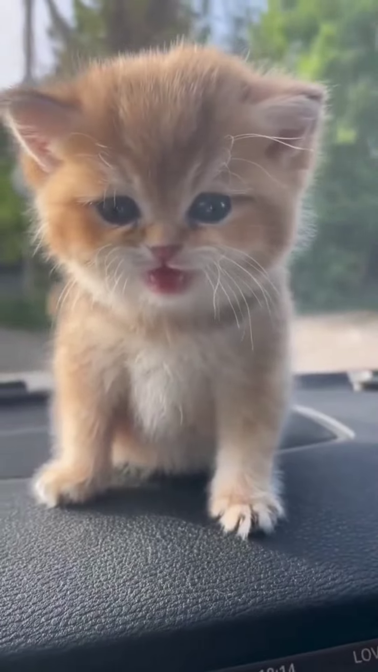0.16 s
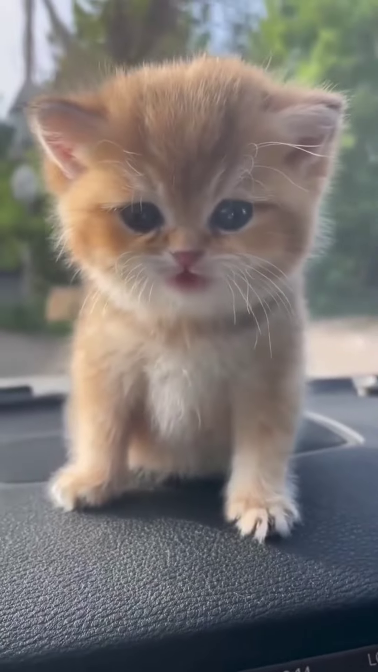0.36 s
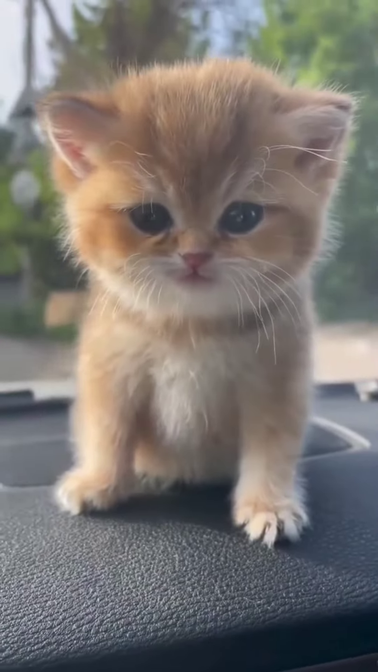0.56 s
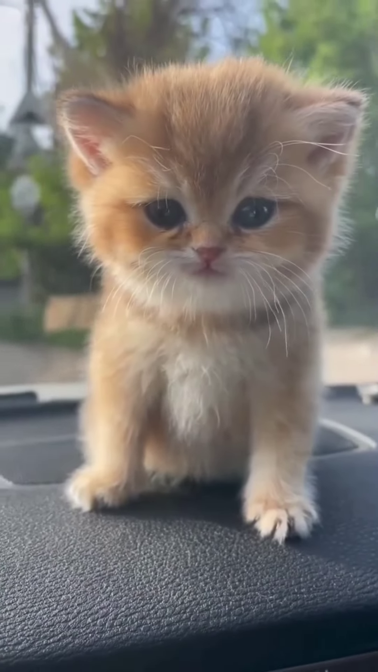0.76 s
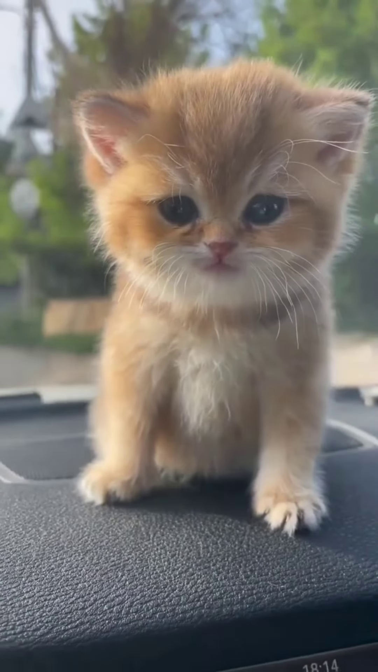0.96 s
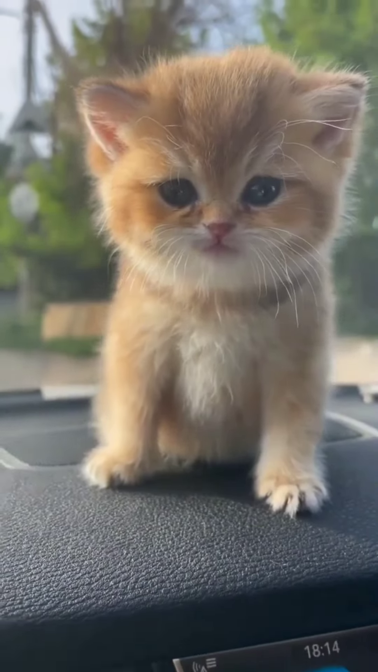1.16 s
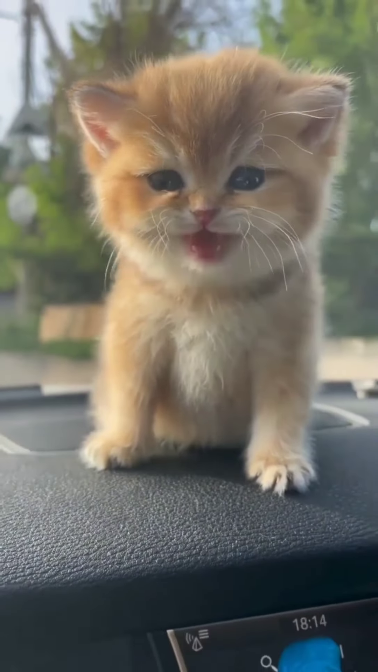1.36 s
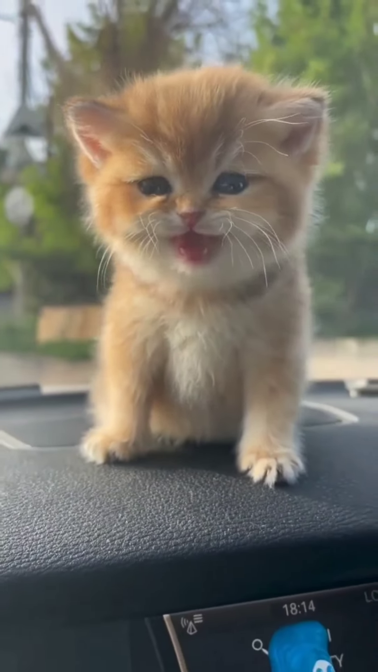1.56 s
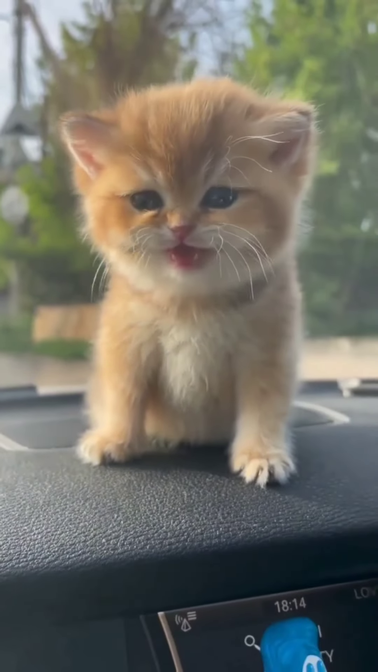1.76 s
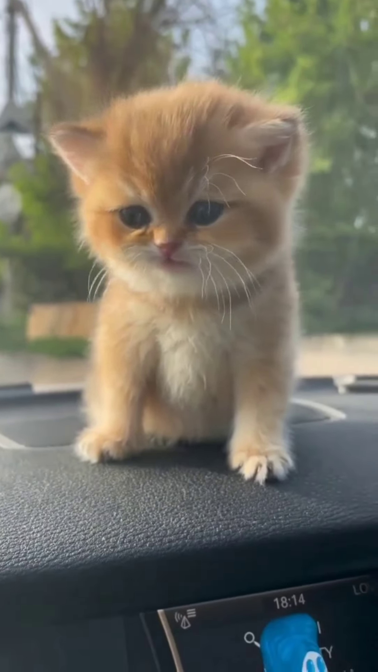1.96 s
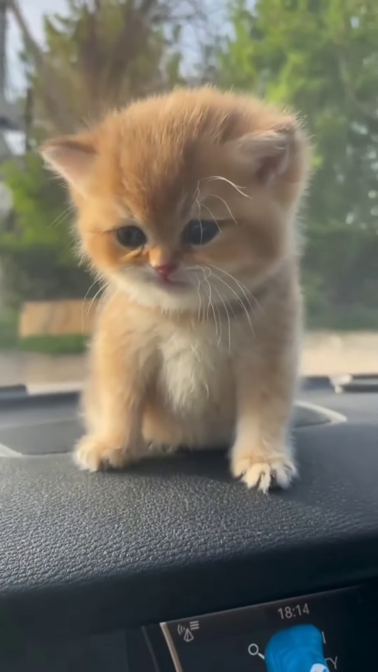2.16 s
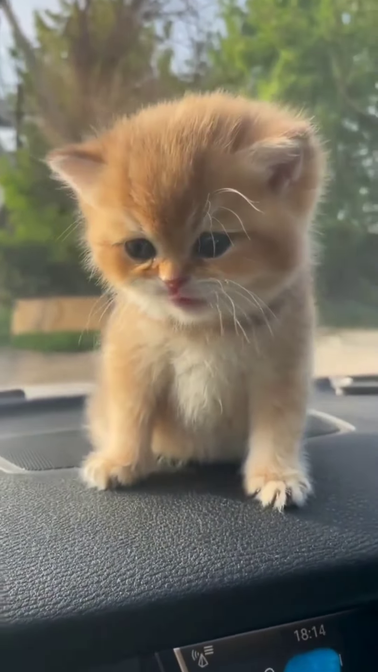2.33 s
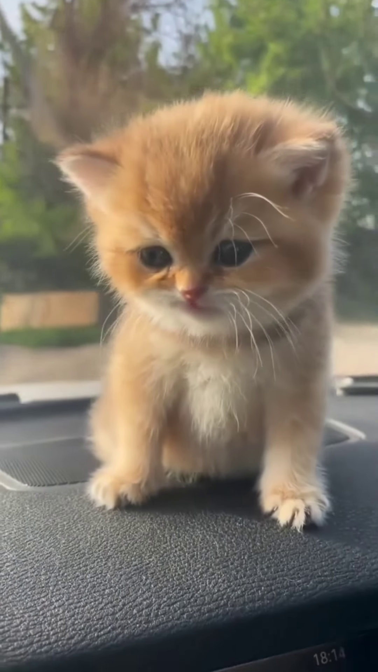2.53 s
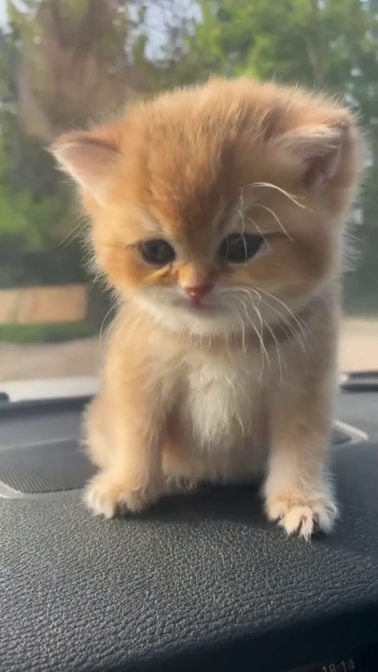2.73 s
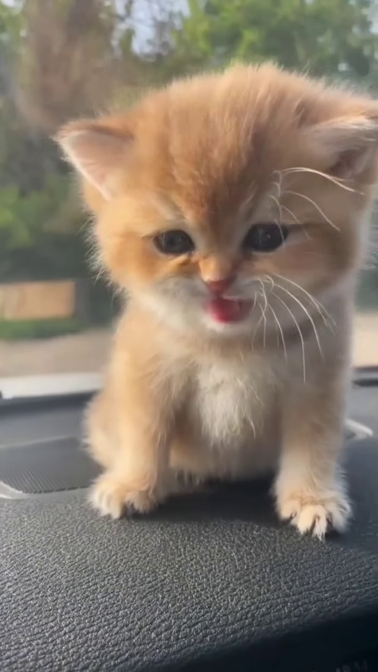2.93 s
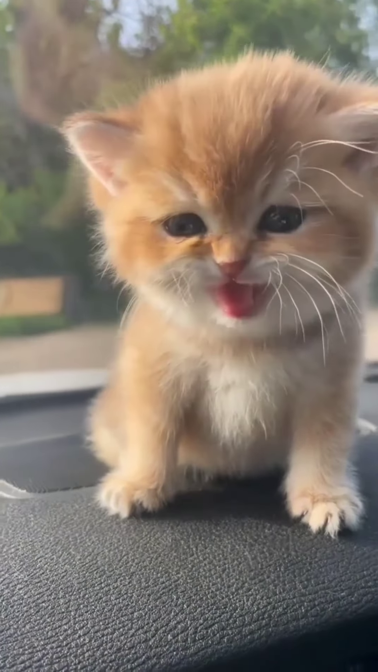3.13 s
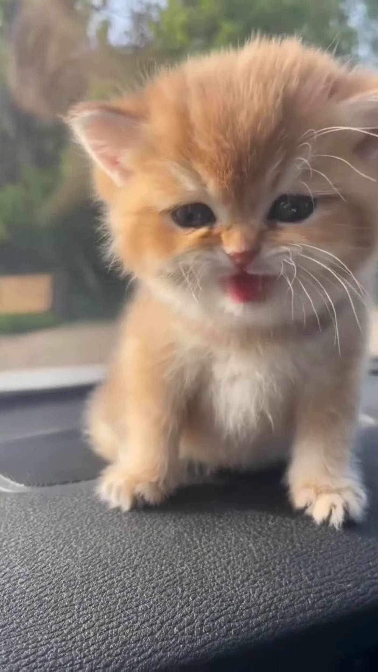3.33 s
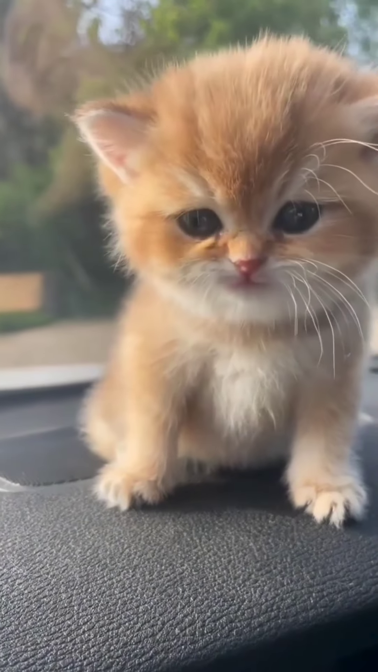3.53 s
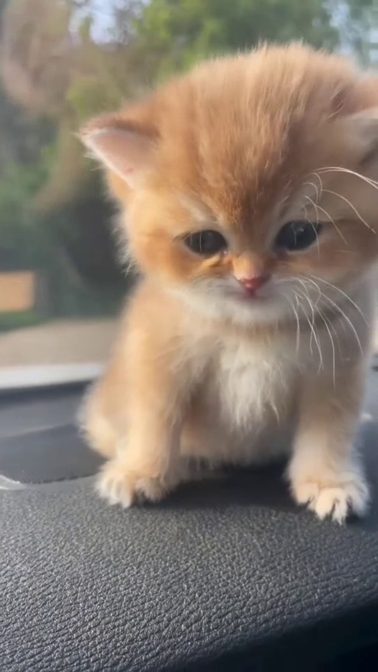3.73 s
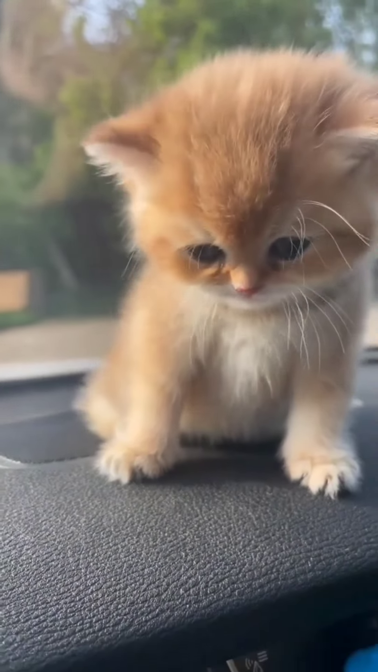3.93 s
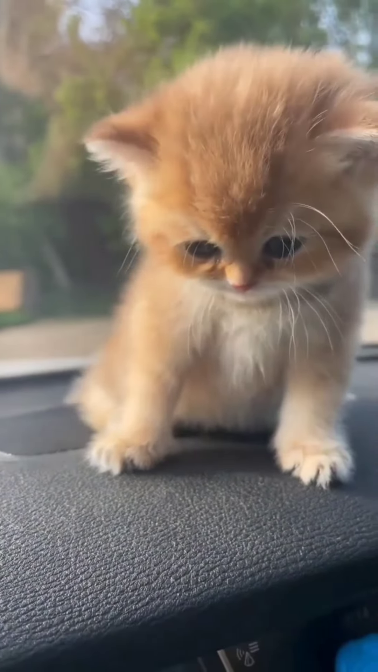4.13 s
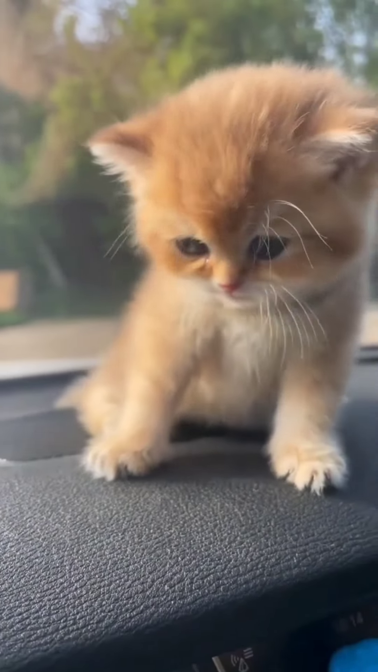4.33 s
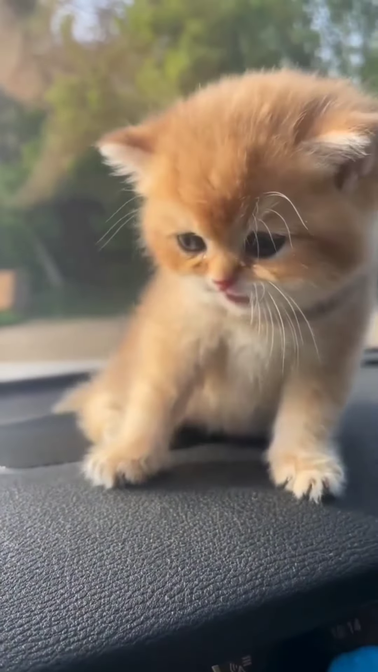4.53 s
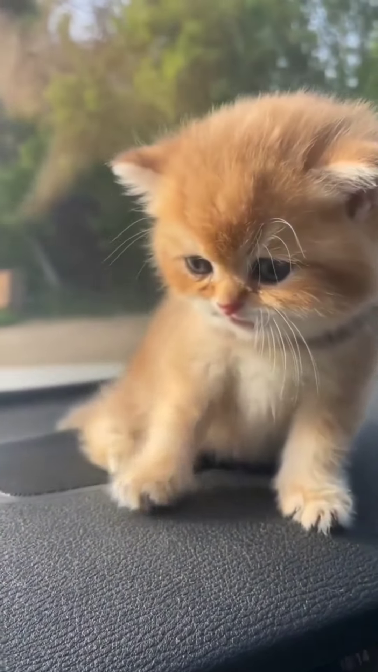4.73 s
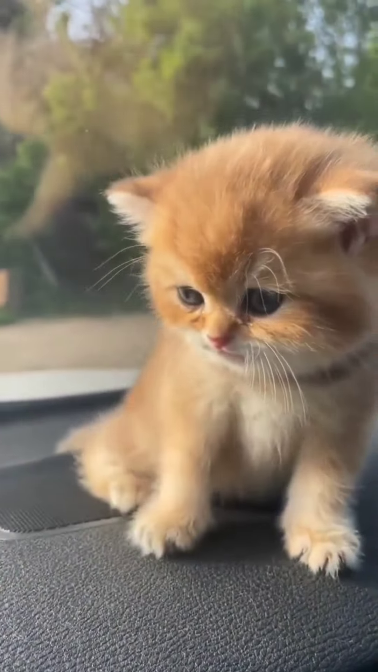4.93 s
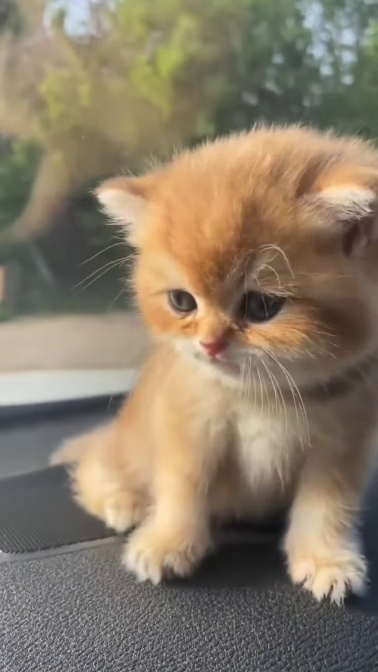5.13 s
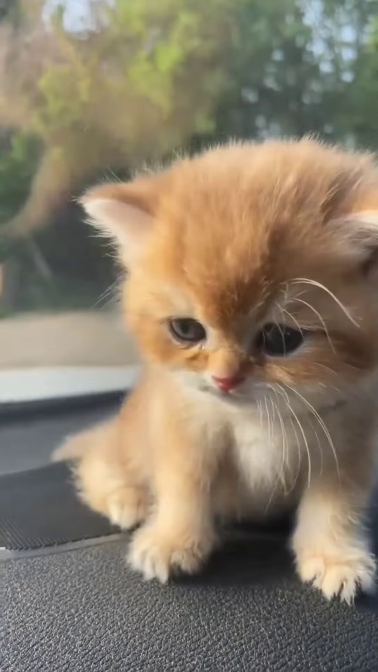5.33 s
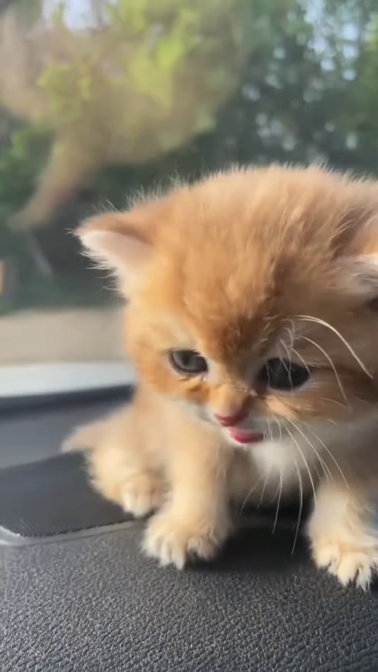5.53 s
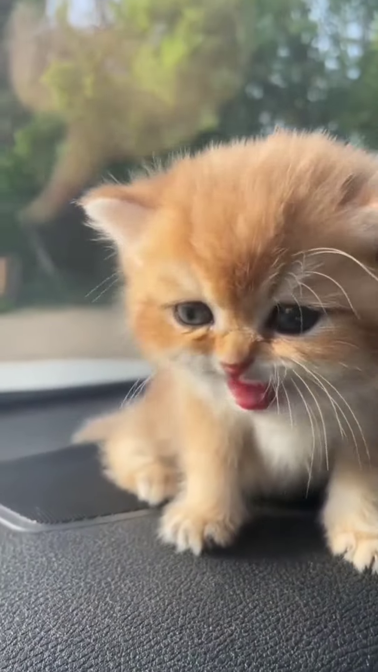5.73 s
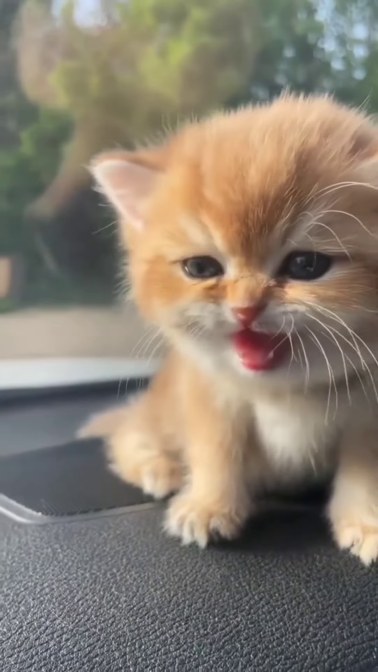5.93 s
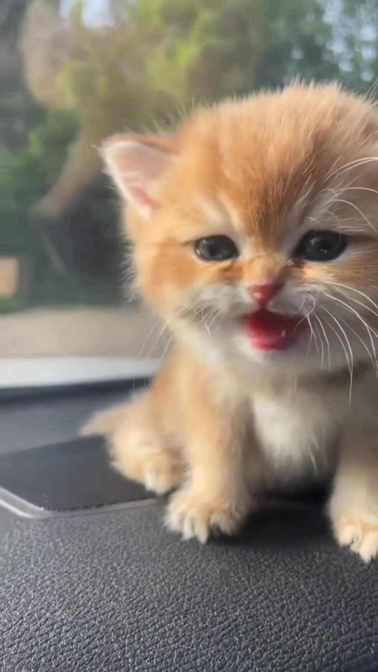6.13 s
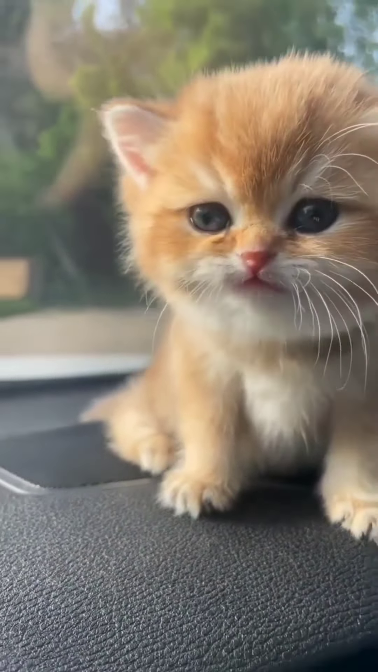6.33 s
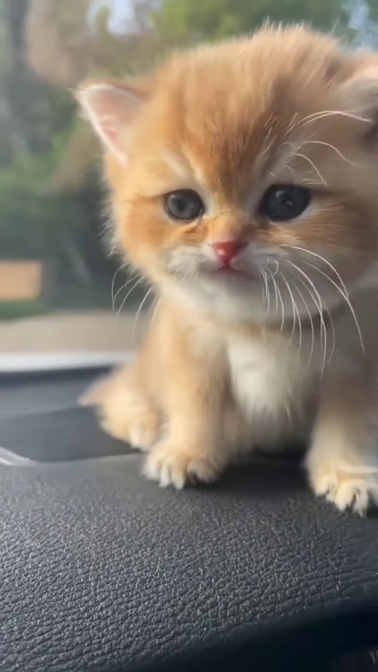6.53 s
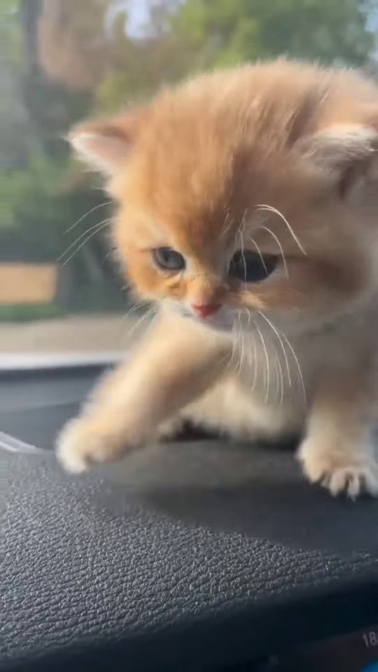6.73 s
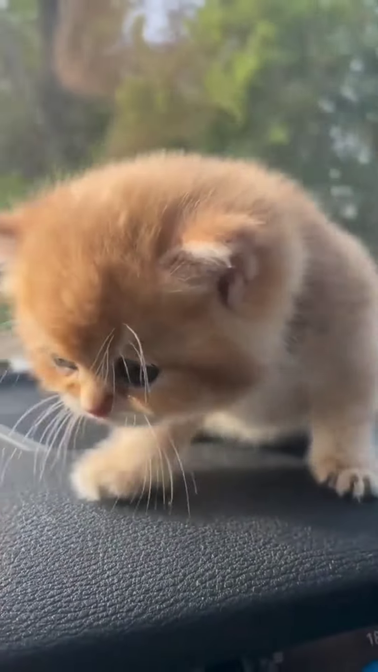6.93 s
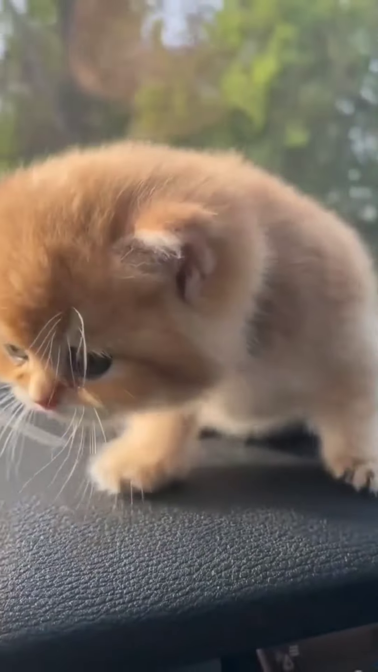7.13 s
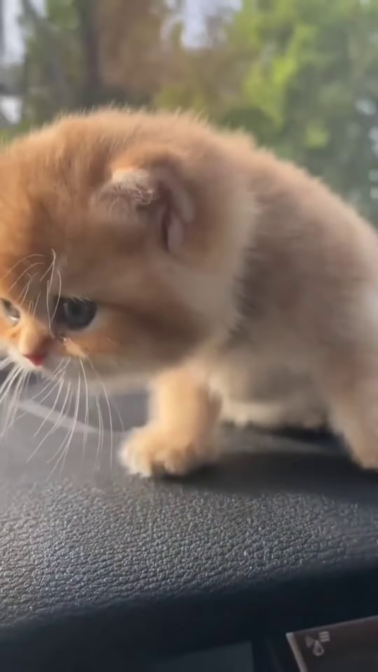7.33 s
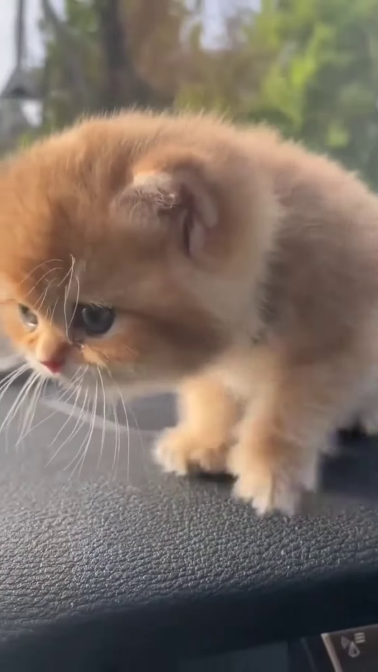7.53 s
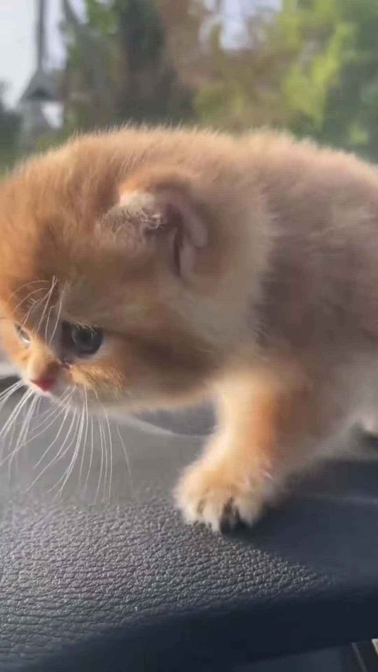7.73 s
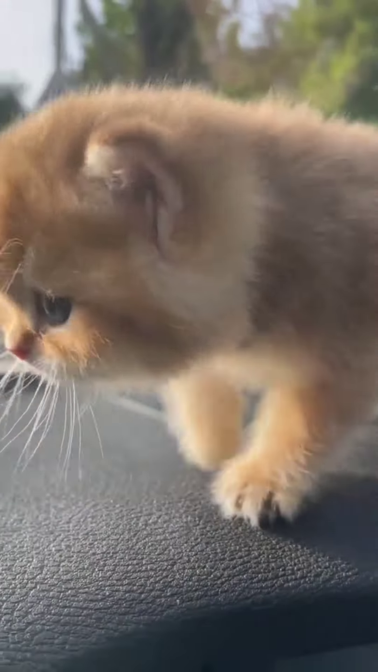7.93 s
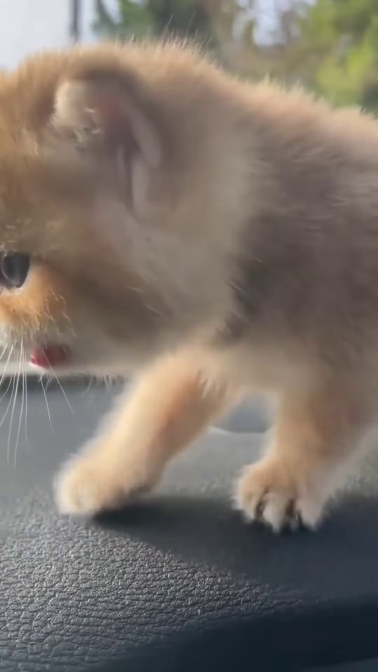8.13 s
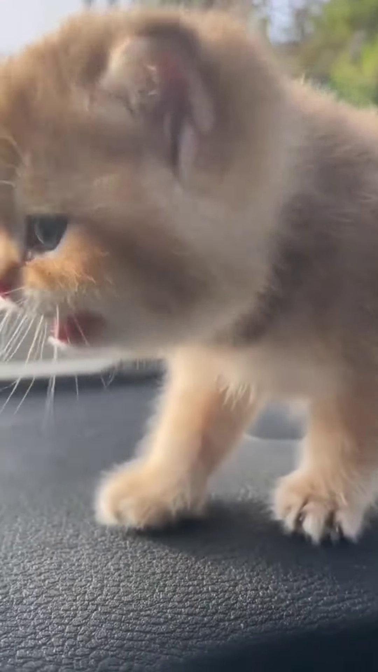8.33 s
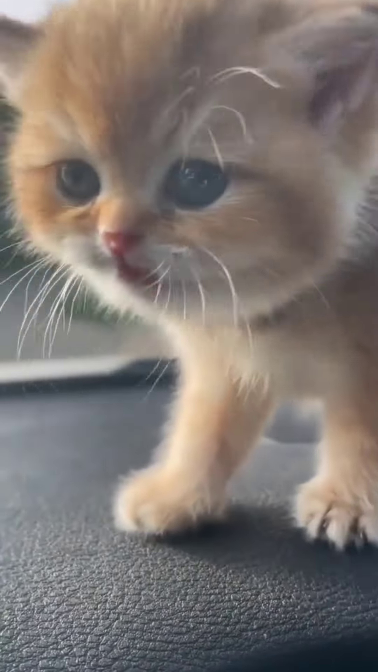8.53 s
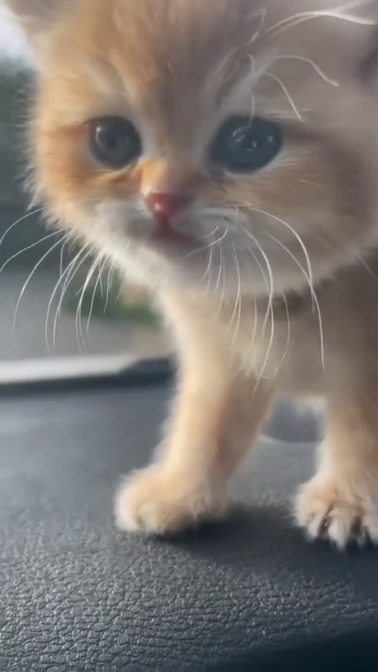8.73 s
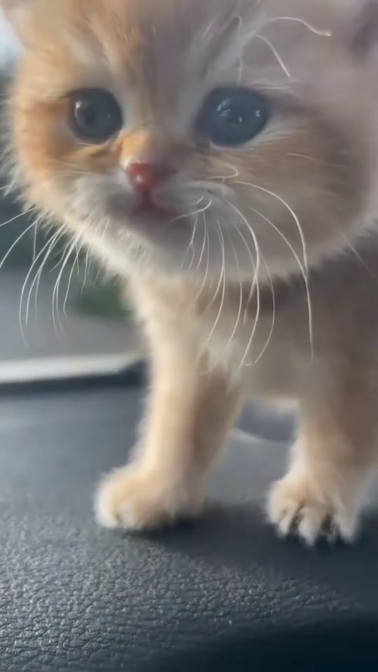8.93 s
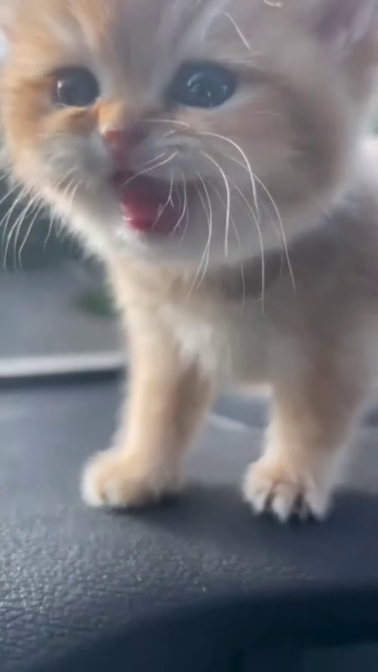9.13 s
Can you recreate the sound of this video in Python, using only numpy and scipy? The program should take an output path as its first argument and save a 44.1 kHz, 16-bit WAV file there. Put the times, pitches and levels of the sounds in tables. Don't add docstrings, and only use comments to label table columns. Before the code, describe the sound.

Close handheld pickup of a very young kitten in a slowly moving car. Short, high, thin mews come about every one or two seconds, some clear, some hoarse, ending in soft lip smacks. Tiny claws tick on hard plastic. Under it the engine hums low, sinks, then revs up boomily after the longest cry and falls back. A sharp claw click and a clipped cry finish it.

```python
import sys
import numpy as np
from scipy import signal
from scipy.fft import rfft, irfft
from scipy.io import wavfile
from scipy.ndimage import uniform_filter1d

SR = 44100
rng = np.random.default_rng(int(sys.argv[2]) if len(sys.argv) > 2 else 0)


def invert_db(level):
    return 10 ** (np.asarray(level, dtype=float) / 20)


def materialize(psi):
    bounded = np.clip(np.atleast_2d(psi).T, -1, 1)
    quanta = np.round(bounded * 32767).astype(np.int16)
    wavfile.write(sys.argv[1], SR, quanta)


N = 404397
T = np.arange(N) / SR


def level(x, db=0):
    return x * invert_db(db) / np.sqrt(np.mean(x ** 2))


def band(x, lo_hz, hi_hz):
    sos = signal.butter(3, [lo_hz, min(hi_hz, .45 * SR)], "band", fs=SR, output="sos")
    return signal.sosfilt(sos, x)


def noise_band(lo_hz, hi_hz, db=0):
    return level(band(rng.standard_normal(N), lo_hz, hi_hz), db)


def walk(rate, size=N):
    k = max(int(SR / rate), 1)
    noise = rng.standard_normal(size + 2 * k)
    return level(uniform_filter1d(uniform_filter1d(noise, k), k))[k:k + size]


def coloured(points):
    hz, db = np.transpose(points)
    f = np.maximum(np.arange(N // 2 + 1) * SR / N, 1)
    weight = invert_db(np.interp(np.log(f), np.log(hz), db, -90, -90))
    return irfft(rfft(rng.standard_normal(N)) * weight, N)


def played(table, edge_s):
    s, *columns = np.transpose(table)
    span = slice(max(int(s[0] * SR), 0), min(int(s[-1] * SR), N))
    t = T[span]
    still_sounding = s[-1] > T[-1] - .01
    fade = np.clip(np.minimum(t - s[0], s[-1] - t + still_sounding) / edge_s, 0, 1)
    return span, [np.interp(t, s, c) for c in columns], fade


def engine_line(hz, db, flutter_db, rate):
    phase = 2 * np.pi * np.cumsum(hz * (1 + .02 * walk(rate))) / SR
    return np.sqrt(2) * invert_db(db + flutter_db * walk(rate)) * np.sin(phase)


# (time [s], firing rate [Hz], boom [dB], road [dB])
DRIVE = [(0.0, 38.66, -55, -71), (0.28, 38.27, -58, -75), (2.12, 36.32, -57, -74),
         (2.48, 36.17, -52.5, -71), (3.04, 35, -60.5, -71.5), (4.72, 30, -57.5, -66.5),
         (5.62, 27.99, -61.5, -67.5), (5.9, 29.23, -73, -65.5), (6.28, 30.86, -49.5, -63.5),
         (6.49, 35.73, -45.5, -63), (6.79, 41.6, -39, -56.5), (7.1, 41.33, -38.5, -57.5),
         (7.33, 40.35, -36.5, -60.5), (7.94, 35.4, -45, -61.5), (8.04, 34.4, -60.5, -64.5),
         (8.17, 33.6, -45.5, -61.5), (8.4, 31.4, -61.5, -64), (9.17, 28.4, -50.5, -67.5)]
# (frequency [Hz], spectrum level [dB per Hz])
ROAD_SPECTRUM = [(12, -40), (20, -4), (32, -6.5), (48, -6.5), (56, -7.5), (65, -18.5), (96, -9.5),
                 (146, -25), (188, -18.5), (238, -26), (608, -44.5), (812, -53.5), (1500, -61),
                 (1950, -93.5), (3300, -120)]
# (frequency [Hz], spectrum level [dB per Hz])
HISS_SPECTRUM = [(410, -28), (700, -2), (821, -10.5), (999, -2), (1100, -8.5), (1550, -8.5), (13200, -18.5)]


def car():
    s, *controls = np.transpose(DRIVE)
    firing_hz, boom_db, road_db = (np.interp(T, s, c) for c in controls)
    boom = engine_line(firing_hz, boom_db, flutter_db=0.74, rate=9)
    drone_db = -57.5 + 0.37 * (boom_db + 56.5) + 0.65 * (road_db + 66.5)
    drone = invert_db(-3) * engine_line(firing_hz + 47.3, drone_db, flutter_db=0.5, rate=14)
    rumble = coloured(ROAD_SPECTRUM)
    rumble = rumble / np.std(band(rumble, 127.2, 330))
    rumble = signal.sosfilt(signal.butter(2, 60, "high", fs=SR, output="sos"), rumble)
    road = rumble * invert_db(road_db + 3 + 2.01 * walk(18))
    hiss = level(coloured(HISS_SPECTRUM), -85) * invert_db(walk(12))
    return boom + drone + road + hiss


# (frequency [Hz], gain [dB])
TRACT = [(500, -6), (1700, -4), (2300, -11), (3100, 2), (3900, -4), (5500, -5.5), (7000, -2.5), (8300, -6),
         (9200, -2.5), (10500, -13), (12000, -12), (13500, -25)]


def tract_db(f, throat_db, mouth_db, mouth_hz):
    opened = 1 / (1 + np.exp((3780 - f) / 120))
    peak_db = 9 * np.exp(-((f - mouth_hz) / 900) ** 2)
    base_db = (1 - opened) * (throat_db - 1) + opened * (mouth_db - 8 + peak_db)
    hz, db = np.transpose(TRACT)
    return base_db + np.interp(np.log(f), np.log(hz), db)


# (time [s], depth [0-1])
DOUBLING = [
    (1.28, 0),
    (1.33, 0.26),
    (1.4, 1),
    (1.5, 0.66),
    (1.56, 0),
]


def mew(table, voice, hiss):
    span, (hz, first_db, open_db, rough), fade = played(table, 0.0032)
    rough, n = np.clip(rough, 0, 1), len(hz)
    second_start, second_end, throat, mouth_start, mouth_end = voice
    second_db = first_db + np.linspace(second_start, second_end, n)
    mouth_hz = np.linspace(mouth_start, mouth_end, n)
    throat_db, mouth_db = first_db + throat + 0.26 * open_db, first_db + open_db

    waver = .002 * walk(41, n) + (0.0009 + .05 * rough) * walk(360, n)
    phase = 2 * np.pi * np.cumsum(hz * (1 + waver)) / SR
    partials = invert_db(first_db) * np.sin(phase)
    partials += invert_db(second_db + 1.6 * walk(30, n)) * np.sin(2 * phase)
    for k in range(3, 19):
        strength = invert_db(tract_db(k * hz, throat_db, mouth_db, mouth_hz) + 1.7 * walk(35, n))
        partials += strength * (k * hz < 14500) * np.sin(k * phase + 0.19 * k)

    half = np.clip(np.interp(T[span], *np.transpose(DOUBLING), 0, 0) + 0.18 * rough, 0, 1)
    alternation = 1 + half * invert_db(3.5 * walk(40, n)) * np.cos(phase / 2)
    shimmer = 1 + .6 * rough * walk(230, n)
    voiced = np.sqrt(2) * partials * alternation * shimmer * np.sqrt(1 - rough)

    air = invert_db(first_db - 14.5) * hiss[0][1][span]
    for f, noise in hiss[1:]:
        air += invert_db(tract_db(f + 0 * hz, throat_db, mouth_db, mouth_hz) - 2.5) * noise[span]
    leak = rough * air * (1 + 0.33 * np.cos(phase))
    return span, fade * (voiced + leak)


# (time [s], pitch [Hz], effort [dB], mouth opening [dB], roughness [0-1])
SQUEAK = [(.045, 1460, -55, -11, 0.54), (.055, 1374, -50.5, -19, 0.33), (.097, 1391, -47, -21, 0.23),
          (.15, 1435, -55, -13, 0), (0.181, 1458, -53.5, -18, 0.39), (.2, 1467, -56, -10, 0.02),
          (0.226, 1460, -59, -10, 0.35), (.25, 1450, -57, -15, 0), (.285, 1370, -81, -33, 0)]
AFTER_SQUEAK = [(.27, 802, -74, -30, .5), (.33, 893, -63.5, -33, 1), (.4, 820, -76, -30, .5)]
MURMUR = [(.55, 630, -82, -30, .35), (.585, 620, -74, -30, .3), (.63, 600, -84, -30, .35)]
WARBLE = [(1.28, 1137, -52.5, -18, 0.88), (1.301, 1074, -48.5, -16.5, 0.46),
          (1.389, 1153, -55.5, -10.5, 0.15), (1.473, 1210, -62.5, -5, 0.14),
          (1.555, 1095, -51, -20.5, 0.49), (1.64, 1055, -53, -16.5, 0.27), (1.747, 1308, -63, -17, 0.037),
          (1.83, 1268, -62.5, -27, 0.026), (1.88, 1150, -91, -30, 0.039)]
CRY = [(2.933, 1029, -49, -6.5, 0.56), (2.955, 1062, -48, 5, 0.25), (3.081, 1031, -49, 4.5, 0.1),
       (3.12, 1015, -53, 9, 0.088), (3.227, 976, -56.5, 10.5, .05), (3.292, 964, -55, -2, 0.041),
       (3.367, 997, -55, -15, .04), (3.375, 1024, -55, -17, 0.28)]
CRY_END = [(3.373, 1100, -60.5, -17, 0.3), (3.414, 1143, -61.5, -14, 0), (3.445, 1145, -64, -16, 0.031),
           (3.458, 1120, -102, -3, 0.018)]
CROAK = [(4.54, 798, -46.5, -25.5, 0.94), (4.584, 812, -47, -30, 0.66), (4.612, 784, -48, -26, .12),
         (4.68, 765, -50.5, -28, .05), (4.693, 776, -47, -33, 1), (4.74, 833, -49.5, -48, 0.92),
         (4.776, 758, -51.5, -30, 0.79)]
CROAK_TOP = [(4.68, 1120, -56, -22, .5), (4.7, 1093, -51, -34, 0.43), (4.751, 996, -51.5, -33, 0.61),
             (4.78, 1000, -51.5, -32, 0.25), (4.8, 1034, -72, -13, 0.12)]
GULP = [(5.438, 1050, -43.5, -28, .2), (5.45, 990, -61.5, -41, 0.062), (5.464, 946, -80, -30, .05)]
YELL = [(5.54, 721, -60, -7, 0.52), (5.555, 771, -47.5, -20, .4), (5.577, 914, -52.5, 9.5, 0.58),
        (5.604, 954, -54.5, 11.5, 0.3), (5.661, 962, -56, 14.5, 0.17), (5.772, 933, -58.5, 20.5, 0.12),
        (5.959, 903.6, -64.5, 24, 0.022), (6.164, 921, -64, 13, 0.1), (6.197, 916, -66, 2.5, .1)]
YELL_END = [(6.197, 1067, -55, -2, 0.091), (6.206, 1110, -51.5, -24, 0.088), (6.227, 1081, -51, -22, 0.12),
            (6.25, 1040, -105, 0.5, .15)]
LAST_CRY = [(9.143, 833, -64, 22, .5), (9.149, 828, -56.5, 14.2, .4), (9.17, 843, -57.5, 19, .4)]
# (2nd partial at start [dB], 2nd partial at end [dB], throat [dB],
# mouth resonance at start [Hz], mouth resonance at end [Hz])
VOICES = [(-13, 0, -4.5, 8900, 8000), (-16, -4, -6.5, 8900, 6300), (-18.5, -5, -13.5, 7100, 6600),
          (-3, -3, 0.5, 5100, 4000), (-15.5, -5, -8, 6000, 1800), (-23, -28, -5, 3400, 5500),
          (-2, 7.5, -3.5, 6330, 4100), (-12, -10.5, -5, 4700, 5800), (6, 16.5, -11, 7500, 5900),
          (-30, -27, -28, 5500, 5500), (-39, -23, -5, 6000, 8500), (-24, -11, -26, 5100, 4900)]
# (lower edge [Hz], upper edge [Hz])
POCKET_HZ = (8550, 9800)


def mews():
    out = np.zeros(N)
    hiss = [(f, noise_band(f - 500, f + 500)) for f in np.arange(1100., 13500, 1000)]
    calls = (SQUEAK, WARBLE, CRY, CRY_END, CROAK, GULP, YELL, YELL_END, LAST_CRY, MURMUR,
             CROAK_TOP, AFTER_SQUEAK)
    for table, voice in zip(calls, VOICES):
        span, sound = mew(table, voice, hiss)
        out[span] += sound
    pocket = signal.butter(3, POCKET_HZ, "bandstop", fs=SR, output="sos")
    passed = signal.sosfilt(pocket, out)
    return passed + invert_db(-24) * (out - passed)


def taps(events, plop_db, focus_db, decay_ms):
    out, t = np.zeros(N), np.arange(2600) / SR
    shape = (1 - np.exp(-t / 0.0008)) * (np.exp(-t * 1000 / decay_ms) + 0.17 * np.exp(-t / 0.0235))
    plop_hz = 300 + 1500 * np.exp(-t / 0.00289)
    plop = np.sin(2 * np.pi * np.cumsum(plop_hz) / SR) * np.exp(-t / 0.015)
    for s, peak_db, bright in events:
        low_db, mid_db, top_db = -focus_db * (np.arange(-1, 2) - bright) ** 2
        noise, drift = rng.standard_normal((2, len(t)))
        crackle = noise * invert_db(4.8 * uniform_filter1d(drift, size=40) * np.sqrt(40))
        burst = level(band(crackle, 331, 820), low_db)
        burst += level(band(crackle, 1480, 3850), mid_db)
        burst += level(band(crackle, 5360, 17000), top_db)
        hit = invert_db(peak_db) * (burst * shape + invert_db(low_db + plop_db) * plop)
        i = int(s * SR)
        out[i:i + len(t)] += hit[:N - i]
    return out


# (time [s], peak level [dB], brightness [-1 dull to 1 bright])
SMACKS = [
    (.387, -62.5, -0.47),
    (1.911, -60.5, -0.37),
    (3.518, -54.5, -0.84),
    (4.81, -54, -0.77),
    (5.439, -62, -0.247),
    (6.229, -58.5, -.6),
    (8.461, -55.5, 0.34),
]


def lip_smacks():
    return taps(SMACKS, plop_db=4, focus_db=4.5, decay_ms=5)


# (peak time [s], rise [s], fall [s], level [dB], brightness [dB])
PANTS = [(1.281, 0.054, 0.0091, -84, -11), (2.3, .04, .11, -83, 7.5), (2.846, .05, 0.028, -76, 10.5),
         (3.688, 0.077, .11, -87.5, 3), (4.35, 0.06, .07, -81, 9), (5.458, .015, .045, -78, 1.5),
         (6.895, 0.018, 0.046, -74, -3.5), (6.971, 0.04, 0.053, -70, -5), (6.83, .12, 0.083, -87, -9.5),
         (7.33, 0.24, .25, -92, -8.5), (8.088, .012, 0.074, -76.5, 4), (8.22, .12, 0.23, -82, -7),
         (9.105, 0.046, 0.048, -68.5, 1), (9.14, 0.025, 0.016, -66, -3.5)]


def pants():
    out = np.zeros(N)
    low = noise_band(650, 2730)
    middle = level(noise_band(4500, 6500) + noise_band(3700, 7150))
    top = noise_band(9800, 13200)
    grain = invert_db(3 * walk(110))
    for s, rise_s, fall_s, db, bright_db in PANTS:
        swell = [(s - rise_s, -14), (s, 0), (s + fall_s, -14)]  # (time [s], level [dB])
        span, (swell_db,), fade = played(swell, 0.029)
        breath = invert_db(-bright_db) * low[span] + invert_db(bright_db) * top[span]
        breath += invert_db(4.5 - 0.57 * abs(bright_db)) * middle[span]
        out[span] += fade * grain[span] * invert_db(db + swell_db) * breath
    return out


# (time [s], peak level [dB], brightness [-1 dull to 1 bright])
CLAWS = [(2.2673, -57.5, -0.74), (2.605, -65, 1), (2.7044, -61.5, -0.21), (2.8444, -53, 1),
         (4.0272, -64.5, 1), (4.316, -61.5, 1), (5.454, -72, 0.29), (6.8922, -56, -.2),
         (6.9721, -51, -0.94), (7.217, -72, 0.91), (7.472, -66.5, -0.3), (7.9167, -56.5, -0.28),
         (8.0815, -63.5, 0.66), (8.373, -60, -1.3), (8.9635, -67, -1.14), (9.1456, -41.5, 0.035)]


def claw_ticks():
    return taps(CLAWS, plop_db=-43, focus_db=8, decay_ms=3.46)


# (centre [Hz], width [Hz], level [dB])
SILENT_BANDS = [
    (635, 140, 5),
    (1480, 444, 1.5),
    (2465, 700, -18),
    (6220, 594, 2.5),
    (7450, 790, -1.5),
]
# (time [s], level [dB])
SILENT_MEW = [
    (8.09, -75),
    (8.12, -78),
    (8.26, -75.5),
    (8.33, -81),
    (8.38, -93),
]


def silent_mew():
    out = np.zeros(N)
    span, (db,), fade = played(SILENT_MEW, 0.0086)
    air = np.zeros(N)
    for hz, width_hz, gain_db in SILENT_BANDS:
        air += noise_band(hz - width_hz / 2, hz + width_hz / 2, gain_db) * invert_db(1.7 * walk(25))
    out[span] = fade * invert_db(db) * air[span]
    return out


def cabin(near):
    t = np.arange(6000) / SR
    ring = rng.standard_normal(len(t)) * invert_db(-60 * t / .08) * (t > .0015)
    ring = ring / np.sqrt(np.sum(ring ** 2))
    return near + invert_db(-7) * signal.fftconvolve(near, ring)[:N]


def scene():
    near = mews() + lip_smacks() + pants() + claw_ticks()
    mid = car() + cabin(near) + silent_mew()
    side = invert_db(-19) * band(mid, 3900, 15000) * walk(300)
    return np.array([mid + side, mid - side])


def band_limit(x):
    return signal.sosfilt(signal.butter(12, 13300, fs=SR, output="sos"), x)


def record(dry):
    return band_limit(dry)


dry = scene()
out = record(dry)
materialize(out)
```